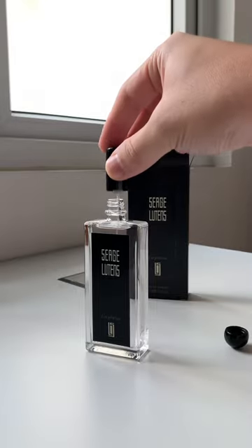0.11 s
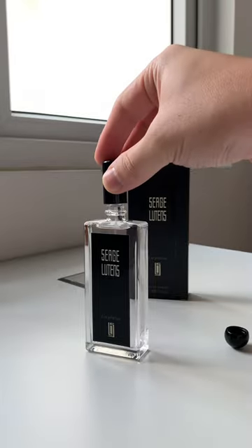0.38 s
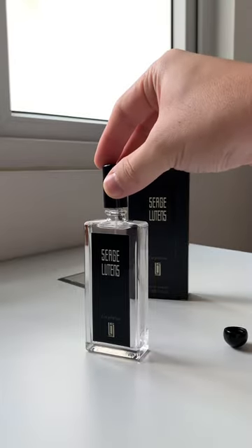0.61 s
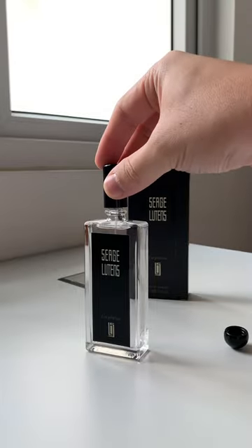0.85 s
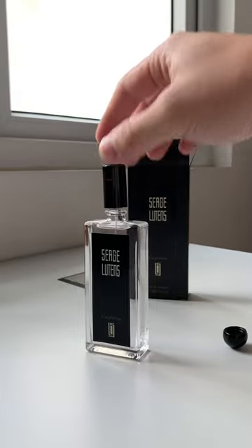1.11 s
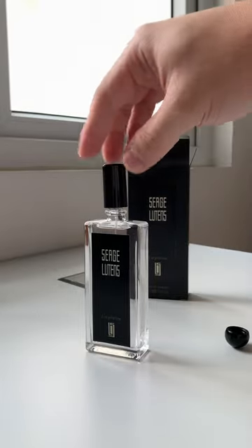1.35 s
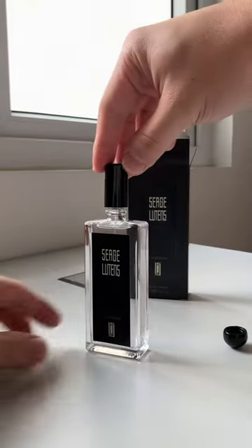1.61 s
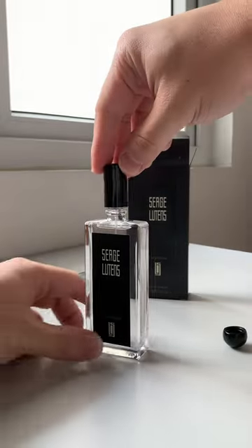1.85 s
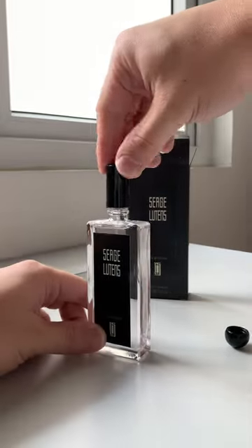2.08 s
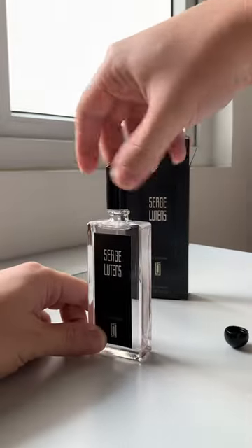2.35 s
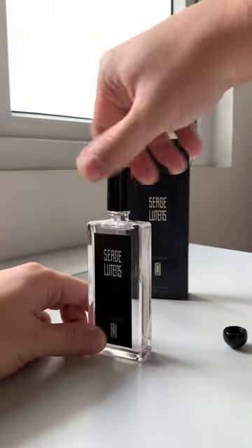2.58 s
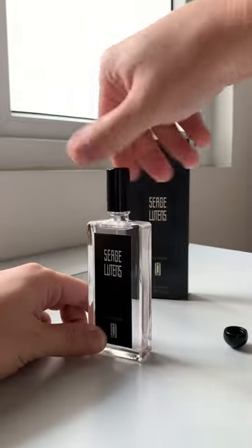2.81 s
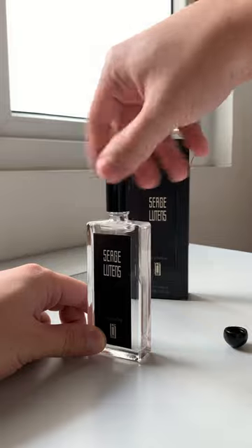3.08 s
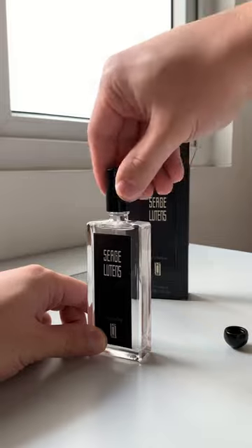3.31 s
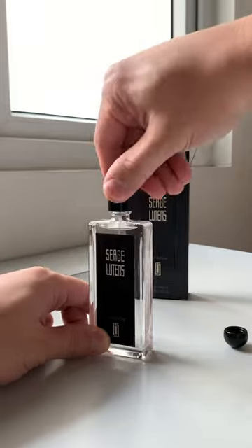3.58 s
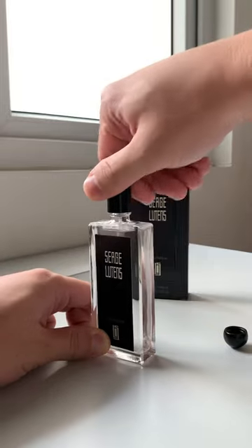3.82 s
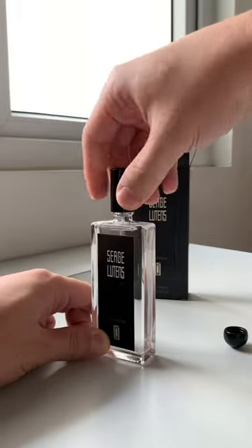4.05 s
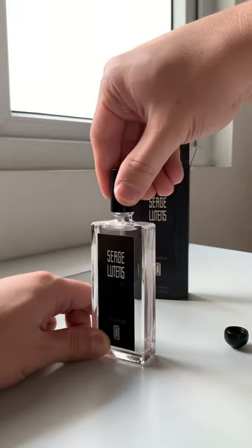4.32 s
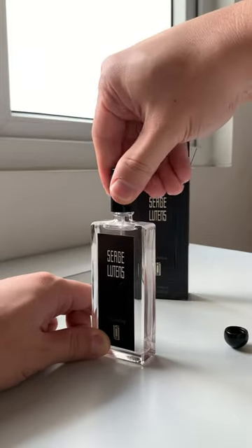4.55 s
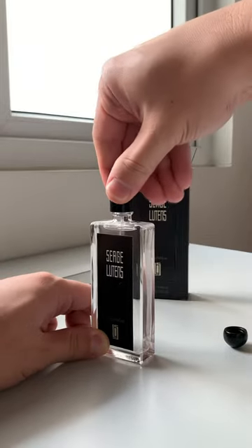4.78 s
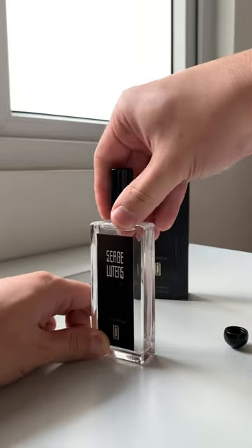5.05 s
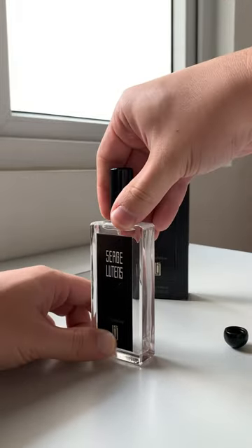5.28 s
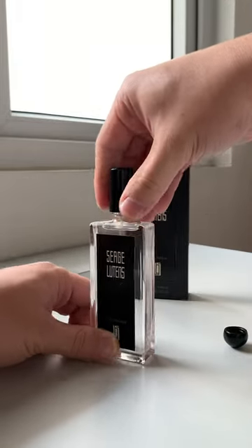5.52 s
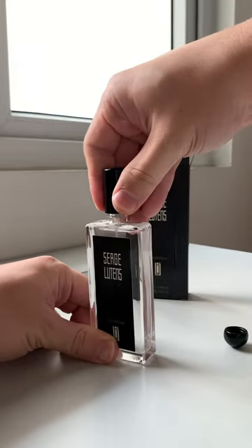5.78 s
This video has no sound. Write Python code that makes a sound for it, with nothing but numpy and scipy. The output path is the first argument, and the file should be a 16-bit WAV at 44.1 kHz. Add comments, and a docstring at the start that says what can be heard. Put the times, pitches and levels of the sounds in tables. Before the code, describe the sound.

Close handling of a small glass bottle and plastic pump, light clinks and grating, a sudden loud thud at three seconds, faint ventilation.

```python
"""Quiet room, light table, phone with two microphone ports close by: a pump is screwed into a thick glass
bottle. Plastic thread and clinks ring decaying glass modes; the dip tube's rim taps ring hollow notes of their
own; grating and dry clicks are coloured noise. Fingers hiss as filtered noise; the base shuffles, and thuds
with one loud bang ring table modes and a room boom. Far off, ventilation rumbles as shaped noise under low fan
tones; the room and a pane send the near sounds back."""
import sys
import numpy as np
from scipy import signal
from scipy.fft import rfft, irfft
from scipy.io import wavfile
from scipy.ndimage import uniform_filter1d

SR = 44100
rng = np.random.default_rng(int(sys.argv[2]) if len(sys.argv) > 2 else 0)


def elevation(decibels):
    """Turn decibel levels (scalar or array-like) into linear amplitude ratios."""
    levels = np.asarray(decibels, float)
    return 10 ** (levels / 20)


def waveform_to_disk(signal):
    """Save audio, clipped to [-1, 1], as 16-bit WAV at the path in sys.argv[1]."""
    frames = np.transpose(np.atleast_2d(signal))
    scaled = np.clip(frames, -1, 1) * 32767
    samples = np.round(scaled).astype(np.int16)
    wavfile.write(sys.argv[1], SR, samples)


N = 260190
TIME = np.arange(N) / SR


def colour(x, points):
    """Filter by (frequency [Hz], level [dB]) points joined on a log-frequency axis; the result has rms 1."""
    hz, db = np.transpose(points)
    f = np.maximum(np.fft.rfftfreq(N, 1 / SR), 1)
    gain = elevation(np.interp(np.log(f), np.log(hz), db))
    y = irfft(rfft(x) * gain, N)
    return y / np.sqrt(np.mean(y ** 2))


def ring(x, hz, t60):
    """One decaying mode, a complex one-pole resonator: a unit blow rings with unit size."""
    pole = np.exp(2j * np.pi * hz / SR - np.log(1000) / (t60 * SR))
    return signal.lfilter([1], [1, -pole], x).imag


def ring_all(x, modes):
    """One drive sets every listed mode ringing at its own strength."""
    return sum(elevation(db) * ring(x, hz, t60) for hz, db, t60 in modes)


def blows(times, gains):
    """Impulses of the given sizes."""
    x = np.zeros(N)
    np.add.at(x, (times * SR).astype(int), gains)
    return x


def soften(x, contact_s):
    """A contact that lasts this long smooths the blow and dulls the sound."""
    push = np.hanning(int(contact_s * SR) + 2)
    return np.convolve(x, push / push.sum())[:N]


def burst(times, gains, rise_s, t60, points):
    """A short spit of coloured noise at each blow, quick to swell and slower to fade."""
    swell = np.exp(-1 / (rise_s * SR))
    fade = np.exp(-np.log(1000) / (t60 * SR))
    poles = np.convolve([1, -swell], [1, -fade])
    shape = signal.lfilter([1 - swell], poles, blows(times, gains))
    return shape * colour(rng.standard_normal(N), points)


def struck(modes, events, scatter_db):
    """Each blow favours the modes near one pitch and scatters their strengths, as if landing elsewhere."""
    s, db, _, best_hz, fall_db = np.transpose(events)
    share = elevation(scatter_db * rng.standard_normal((len(s), len(modes))))
    out = 0
    for k, (hz, mode_db, t60) in enumerate(modes):
        reach_db = -np.maximum(fall_db, 0) * np.abs(np.log2(hz / best_hz))
        hits = blows(s, elevation(db + mode_db + reach_db) * share[:, k])
        out = out + ring(hits, hz, t60)
    return out


def strokes(rows, onset_db_per_s, fade_db, octaves=0):
    """Gain of strokes that set in, climb, then lose fade_db per further length; a fifth column tilts by octave."""
    out = 0
    for start, length, db, climb_db, *tilt in rows:
        done = (TIME - start) / length
        held_db = db - climb_db * np.clip(1 - done, 0, 1) + octaves * sum(tilt)
        onset_db = onset_db_per_s * np.maximum(start - TIME, 0)
        after_db = fade_db * np.maximum(done - 1, 0)
        out = out + elevation(held_db - onset_db - after_db)
    return out


# the two microphone ports: (frequency [Hz], likeness [0-1], left port's phase lead [rad], left minus right [dB])
PORT_PAIR = [(45, .98, 0, 0), (255, .9, .1, 1), (330, .85, 0, 3), (420, .65, -2.3, 4), (500, .75, -2.9, 0),
             (580, .65, -4.1, 1), (760, .55, -3.2, 1), (1100, .55, -2.2, -1), (1750, .6, -4.3, -1),
             (2700, .45, -2.4, 0), (3900, .3, -4.5, -1), (6400, .97, -.1, 0), (7400, .97, .1, 0),
             (9300, .97, 3, 0), (10100, .97, 3.4, 0), (11700, .95, 6.1, 0), (13000, .95, 6.3, 0),
             (14000, .8, 8.9, 0)]


def ports(a, b):
    """Two sounds reach both ports: a is shared, b parts them; phase and balance shift with frequency."""
    f = np.fft.rfftfreq(N, 1 / SR)
    hz, *columns = np.transpose(PORT_PAIR)
    like, lead, left_db = (np.interp(f, hz, c) for c in columns)
    side = np.array([[1], [-1]])
    common = np.sqrt((1 + like) / 2) * rfft(a)
    parting = side * np.sqrt((1 - like) / 2) * rfft(b)
    return irfft((common + parting) * elevation(side * left_db / 2) * np.exp(.5j * side * lead), N)


# far ventilation and microphone hiss, spectrum shape: (frequency [Hz], relative density [dB])
AIR_SHAPE = [(31, -33), (41, 1.5), (60, -2), (90, -7), (140, -9), (260, -7), (400, -15.5), (500, -15.5),
             (640, -35), (800, -29.5), (1050, -22.5), (1500, -29), (2200, -35), (3200, -52), (5000, -53.5),
             (13500, -52.5), (14800, -62)]
# distant fan motors: (frequency [Hz], relative level [dB])
FAN_TONES = [(43.5, -58), (48.2, -61.5), (70, -63)]


def air():
    """Far-off rumble and hiss, noise that swells a little, with fan tones that beat against each other."""
    swell = uniform_filter1d(uniform_filter1d(rng.standard_normal(N), size=6000), size=6000)
    level = elevation(-52 + 0.57 * swell / swell.std())
    a, b = (colour(rng.standard_normal(N), AIR_SHAPE) * level for _ in range(2))
    hum = sum(2 ** .5 * elevation(db) * np.sin(2 * np.pi * (hz * TIME + rng.random())) for hz, db in FAN_TONES)
    return ports(a + hum, b)


# how long the room's tail lasts: (frequency [Hz], time to fall 60 dB [s])
ROOM_DECAY = [(125, 0.45), (300, 1), (1000, 0.72), (3000, 0.51), (8000, 0.18)]


def echo():
    """One random room answer: quick reflections off table and window, then a tail longest near 300 Hz."""
    t = TIME[:SR]
    hz, t60 = np.transpose(ROOM_DECAY)
    tail = 0
    for f in 90 * 2. ** np.arange(8):  # octave bands
        octave = signal.butter(2, [f / 2 ** .5, f * 2 ** .5], "band", fs=SR, output="sos")
        band = signal.sosfilt(octave, rng.standard_normal(SR))
        decay = elevation(-60 * t / np.interp(np.log(f), np.log(hz), t60))
        tail = tail + band * decay * np.clip(t / 0.011, 0, 1)
    # differenced noise leans to the treble
    early = np.diff(rng.standard_normal(SR + 1)) * elevation(-60 * t / .04)
    tail = elevation(-12.5) * tail / np.sqrt(np.sum(tail ** 2))
    return tail + elevation(-6) * early / np.sqrt(np.sum(early ** 2))


# bottle glass: (frequency [Hz], time to fall 60 dB [s]), then each mode's relative strength [dB]
GLASS_RINGS = [(1812, .085), (2520, .02), (3190, .03), (3780, .02), (4995, .07), (6220, .06), (6900, .12),
               (7004, .13), (7260, .05), (8475, .05), (10170, .08), (12270, .09), (13420, .07),
               (13930, .05)]
GLASS_STRENGTH = [-1.5, -3, -33, -14.5, -11.5, -28, -22.5, -2.5, -7, -9.5, -8, -9.5, -17, -22.5]
GLASS = [(hz, db, t60) for (hz, t60), db in zip(GLASS_RINGS, GLASS_STRENGTH)]
# hiss of skin, spectrum shape: (frequency [Hz], relative level [dB])
SKIN_SHAPE = [(1000, 4), (3000, -3), (5000, 1), (8000, 10.5), (12000, 6), (14500, -3.5)]
# skin brushes over a smooth surface: (start [s], length [s], relative level at the end [dB], climb [dB])
SKIN_BRUSHES = [(1.49, 0.099, -55, 0.5), (3.462, 0.057, -54.5, 18.5), (3.655, 0.051, -60, -6.5)]


def brushing():
    """Soft hiss of skin, filtered noise that barely wakes the glass."""
    gain = strokes(SKIN_BRUSHES, onset_db_per_s=1198.5, fade_db=22)
    rub = colour(rng.standard_normal(N), SKIN_SHAPE) * gain
    return elevation(-6.0) * rub + elevation(-39.5) * ring_all(rub, GLASS)


# table top modes, with one long low room boom at 128 Hz:
# (frequency [Hz], time to fall 60 dB after a thud [s]), then each mode's relative strength [dB]
THUD_RINGS = [(128, 1.4), (160, .12), (203, .28), (255, .28), (312, .22), (331, .15), (408, .13), (505, .2),
              (569, .1), (757, .08), (1062, .05), (1207, .06), (1418, .08), (1772, .045), (2014, .045),
              (2318, .045), (3190, .03)]
THUD_STRENGTH = [-19.5, -16.5, -7, -3.5, -4.5, -7.5, -3, -14, -1, -10, -2.5, -14, -16, -12, -15.5, -15,
                 -12.5]
TABLE_AND_BOOM = [(hz, db, t60) for (hz, t60), db in zip(THUD_RINGS, THUD_STRENGTH)]
# the held bottle shuffles on the table: (start [s], length [s], relative level at the end [dB], climb [dB])
BASE_SHUFFLES = [(2.49, 0.026, -44, -7), (4.6, .06, -48.5, 3), (4.92, 0.17, -51.5, 2),
                 (5.3, .08, -48, -3.5), (5.6, 0.089, -56.5, -8.5)]


def shuffling():
    """Small irregular pushes of the base keep the table's low modes murmuring."""
    pushes = (rng.random(N) < 150 / SR) * rng.standard_normal(N)  # about 150 a second
    pushes = pushes / pushes.std() * strokes(BASE_SHUFFLES, onset_db_per_s=500.5, fade_db=13)
    # the table modes above the room boom die sooner here than after a thud
    low_modes = [(hz, db, 0.51 * t60) for hz, db, t60 in TABLE_AND_BOOM if 150 < hz < 540]
    return elevation(-30) * ring_all(pushes, low_modes)


# the thread catches and squeaks: (start [s], length [s], relative level at the end [dB], climb [dB])
THREAD_SQUEAKS = [(2.01, 0.01, -69, 7.5), (2.11, 0.11, -60.5, -1.5)]


def squeaking():
    """Fine noisy chatter at the rim feeds only the glass modes between 12 and 13.6 kHz."""
    chatter = rng.standard_normal(N) * strokes(THREAD_SQUEAKS, onset_db_per_s=407, fade_db=44)
    return elevation(-20) * ring_all(chatter, [mode for mode in GLASS if 12000 < mode[0] < 13600])


# the dip tube taps the rim: (time [s], relative level [dB], pitch [Hz])
RIM_TAPS = [(0.2103, -33.5, 1683), (0.253, -60, 1730), (0.273, -53, 1860)]


def tube():
    """Short hollow notes from a soft contact, one mode each, higher as the tube slides in."""
    notes = sum(ring(blows(np.array([s]), elevation(db)), hz, t60=0.065) for s, db, hz in RIM_TAPS)
    return soften(notes, contact_s=0.00053)


# crack at the start of a thud, spectrum shape: (frequency [Hz], relative level [dB])
CRACK_SHAPE = [(120, -49), (300, 13.5), (1000, -18), (2200, -13.5), (3500, -37.5), (7000, -34.5),
               (14000, -52)]
# table thuds, from the bottle base or from clinks passed down through the bottle:
# (time [s], relative level [dB], crack against the thud [dB], favoured pitch [Hz],
# fall away from it [dB per octave])
TABLE_THUDS = [(0.2126, -29.5, -46, 496, 15), (1.479, -44.5, -21.5, 134.6, 0.5),
               (2.21, -37.5, -25.5, 267, 18.5), (2.496, -35, -5.5, 273, -2), (2.748, -28.5, -29.5, 700, 8),
               (2.955, -30.5, -20.5, 586, 13), (3.0574, -6.5, -3.5, 294, -2.5),
               (3.096, -17.5, -14, 1401, 6), (3.947, -31.5, -8, 266.5, 2), (4.621, -39.5, -22, 551, 11.5),
               (4.904, -41, -26.5, 200, 16.5), (5.107, -29.5, -40, 199, 32), (5.2425, -21, -22, 408, 27.5),
               (5.598, -41.5, -22, 503, 8.5)]


def thuds():
    """Blows ring the table modes and the low room boom; each starts with a crack, a noise burst."""
    s, db, crack_db = np.transpose(TABLE_THUDS)[:3]
    boom = soften(struck(TABLE_AND_BOOM, TABLE_THUDS, scatter_db=1.5), contact_s=0.00018)
    crack = burst(s, elevation(db + crack_db), rise_s=0.0026, t60=0.092, points=CRACK_SHAPE)
    return elevation(-7.0) * boom + crack


# plastic thread, spectrum shape: (frequency [Hz], relative level [dB])
SCRAPE_SHAPE = [(120, -25.5), (300, 11), (1000, -3.5), (2500, -10), (5000, -16), (9000, -13.5),
                (14000, -31)]
# twists of the thread round the neck: (start [s], length [s], relative level at the end [dB], climb [dB],
# brightness of the singing [dB per octave])
THREAD_TWISTS = [(2.02, 0.024, -78.5, -3, 14), (2.1, 0.082, -60.5, 7, 4), (2.205, 0.035, -61.5, 0.5, 0.5),
                 (2.495, 0.055, -43.5, 8.5, 1.5), (2.725, 0.03, -40.5, 11.5, 0.5),
                 (2.955, 0.027, -55, 3, -1)]


def screwing():
    """Dense uneven slips of the thread keep the glass singing and grate in the plastic."""
    slips = (rng.random(N) < 2000 / SR) * rng.standard_normal(N)  # about 2000 a second
    slips = slips * elevation(2.0 * rng.exponential(size=N))
    slips = slips / slips.std()

    def twist(octaves):
        return strokes(THREAD_TWISTS, 599, 34, octaves)

    sing = 0
    for hz, db, t60 in GLASS:
        drive = slips * twist(np.log2(hz / 7000))
        sing = sing + elevation(db) * ring(drive, hz, t60)
    return elevation(-23.0) * sing + colour(slips, SCRAPE_SHAPE) * twist(0)


# pump against the neck: (time [s], relative level of the ring [dB], dry click against the ring [dB],
# favoured pitch [Hz], fall away from it [dB per octave])
NECK_CLINKS = [(0.075, -50, -16, 12300, 18), (0.2125, -50, -12, 12300, 16.5), (0.296, -50.5, -25, 6900, 35),
               (0.4645, -53, 6.5, 7010, 2.5), (1.063, -65.5, 16, 3420, 3), (2.4322, -38.5, 1.5, 1810, 4.5),
               (2.4576, -45, -8, 7150, 9), (2.501, -44, -23.5, 7240, 11), (2.538, -24.5, -2.5, 6650, 19),
               (2.7009, -31, 0.5, 1800, 3.5), (2.7322, -38, -6.5, 7060, 19), (2.747, -32, 3.5, 7040, 4),
               (2.947, -24, -5, 4000, 9), (2.9794, -45, -1, 12300, 18.5), (3.459, -44, -9.5, 12300, 16.5),
               (3.905, -69, -10.5, 6960, 7.5), (4.3744, -57.5, -7, 7420, 32),
               (4.5634, -59.5, -12, 7260, 28.5), (4.936, -51, -6.5, 2520, 34),
               (5.774, -64.5, -2, 8400, 10.5), (5.8153, -44, -14, 2520, 28.5)]


def clinks():
    """Blows ring the glass modes, with the dry click of plastic on the rim as a noise burst."""
    s, db, click_db = np.transpose(NECK_CLINKS)[:3]
    ringing = struck(GLASS, NECK_CLINKS, scatter_db=1.5)
    click = burst(s, elevation(db + click_db), rise_s=0.00051, t60=0.0065, points=SCRAPE_SHAPE[2:])
    return elevation(-7) * ringing + click


def scene():
    """Hands and bottle close to the ports, direct and through the room, over the far air."""
    near = brushing() + shuffling() + squeaking() + tube() + thuds() + screwing() + clinks()
    # small objects send out no deep bass
    near = signal.sosfilt(signal.butter(4, 105., "high", fs=SR, output="sos"), near)
    shared, apart = (signal.fftconvolve(near, echo())[:N] for _ in range(2))
    # the window pane behind returns one strong copy from the side, 3.1 ms late
    pane = elevation(5.0) * np.roll(near, int(.0031 * SR))
    return ports(near + shared, pane + apart) + air()


def top_cut(x):
    """Nothing passes above the cut-off."""
    return signal.sosfilt(signal.butter(12, 14560, fs=SR, output="sos"), x)


def record(dry):
    """The phone rounds the loudest peak by soft saturation and cuts the top above 15.6 kHz."""
    rounded = np.tanh(0.88 * dry) / 0.68
    lowpass = signal.ellip(8, .2, 70, 15600, fs=SR, output="sos")
    mix = signal.sosfilt(lowpass, rounded)
    return top_cut(mix)


dry = scene()
out = record(dry)
waveform_to_disk(out)
```